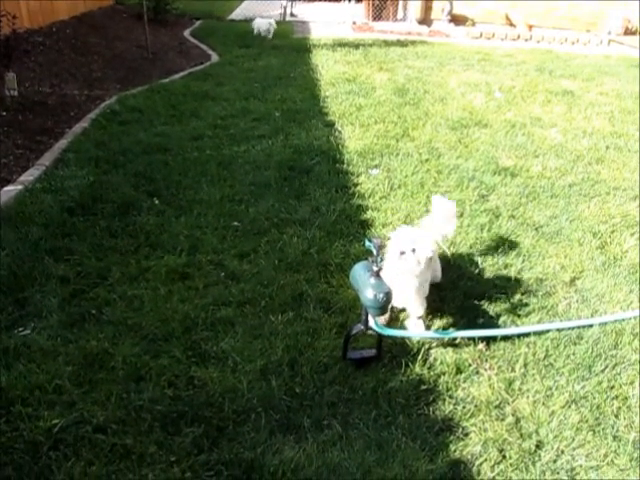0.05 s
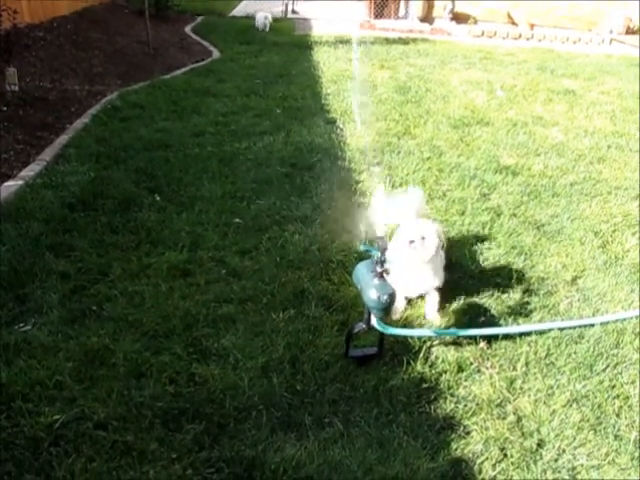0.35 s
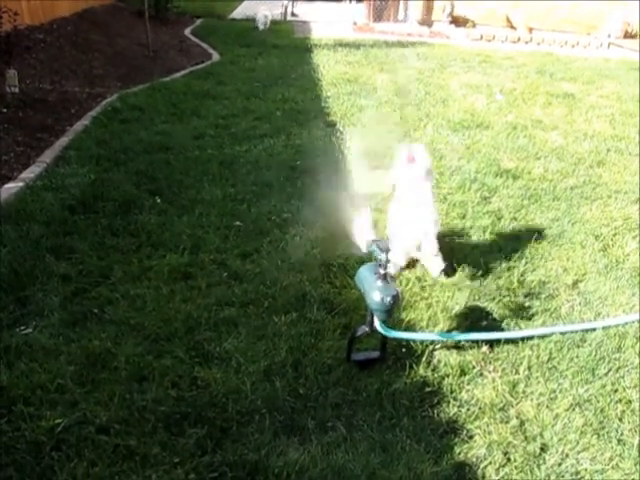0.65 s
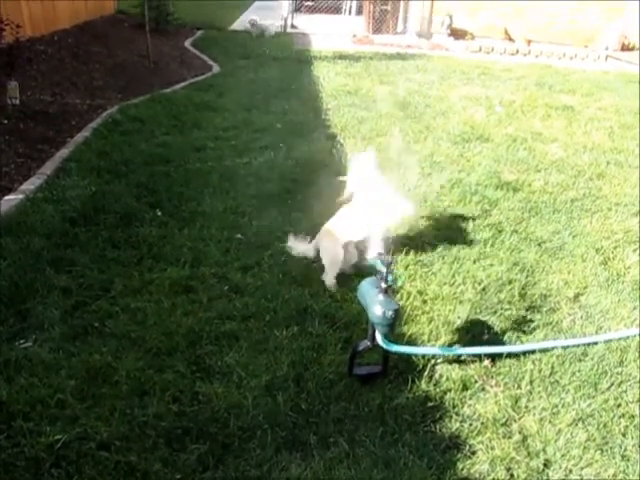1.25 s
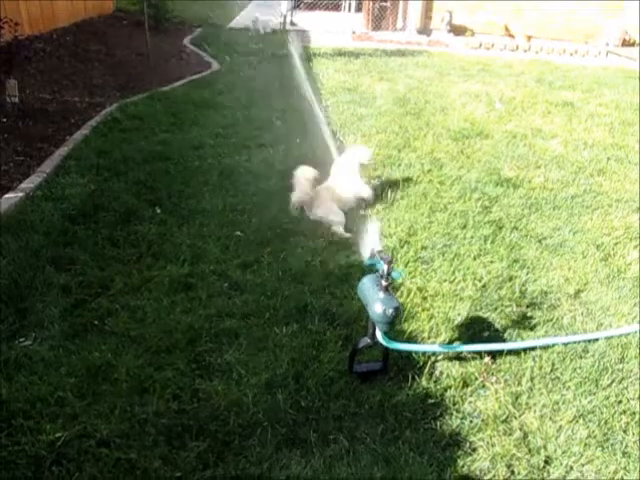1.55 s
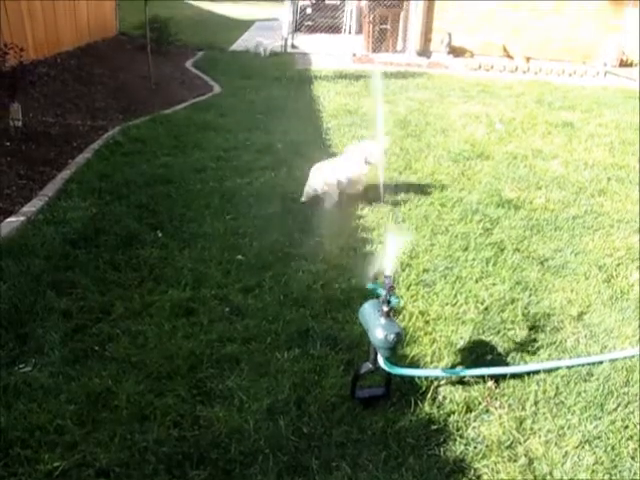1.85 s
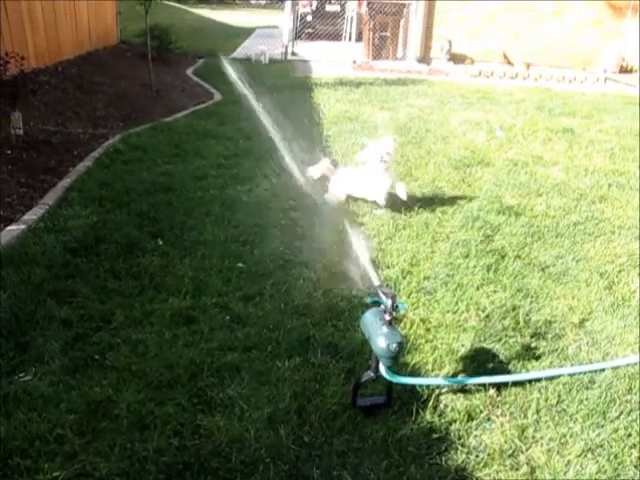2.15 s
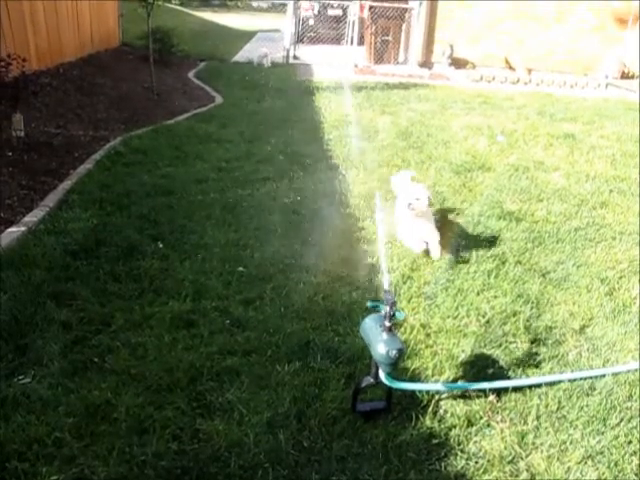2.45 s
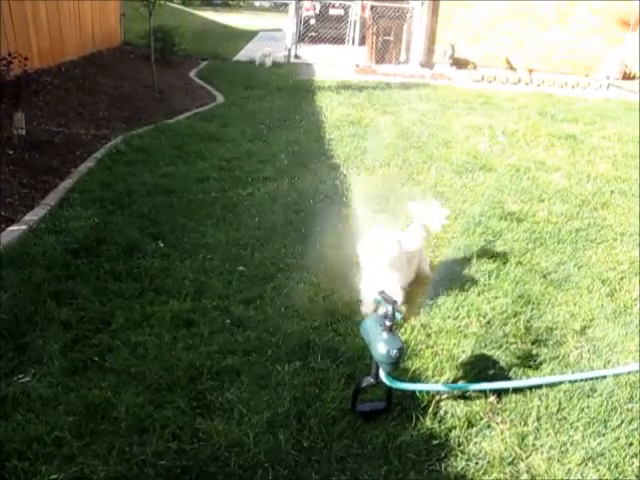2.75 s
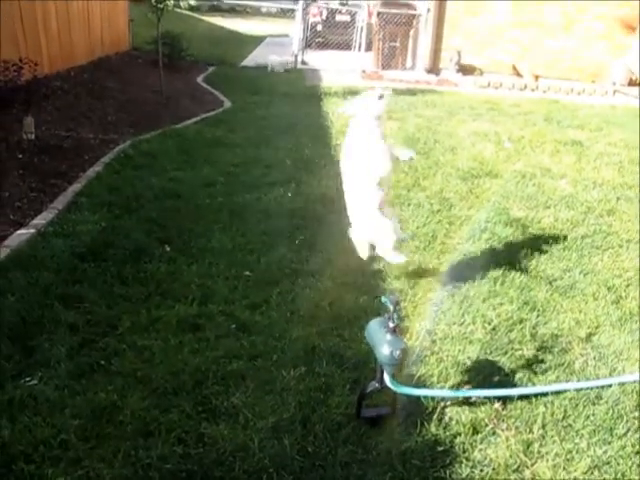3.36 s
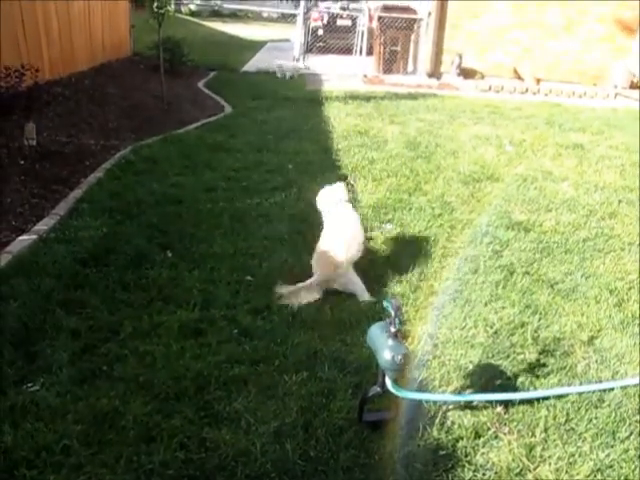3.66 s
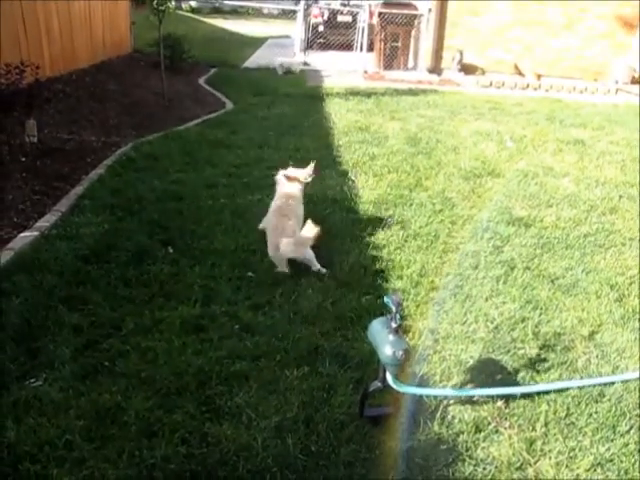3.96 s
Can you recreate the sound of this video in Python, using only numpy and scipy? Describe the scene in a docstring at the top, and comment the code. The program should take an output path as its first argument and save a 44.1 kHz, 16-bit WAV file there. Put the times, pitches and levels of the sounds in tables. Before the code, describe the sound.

An impact sprinkler ticks on a back lawn, following one hoarse, rising yip from a small dog at the very start. From 0.2 seconds, sharp, even ticks run over hissing water, breaking into quick rattles near 0.7, 1.3, 2.1 and 2.8 seconds. The ticking ends with a splash around 3.4 seconds, leaving a few drops and faint outdoor air. Soft wind buffets the microphone near 0.9 and 3.5 seconds.

```python
"""First you hear a small dog's hoarse, rising yip; then an impact sprinkler ticks on a back lawn.
Its arm slaps the hissing water jet in slow runs, then rattles back through its own spray.
Each slap rings the sprinkler head and echoes off the ground and a fence.
Behind it all are a faint murmur of outdoor air, a thin hum and low buffets on the microphone."""
import sys
import numpy as np
from scipy import signal
from scipy.fft import rfft, irfft, next_fast_len
from scipy.io import wavfile
from scipy.ndimage import uniform_filter1d, map_coordinates

SR = 44100
rng = np.random.default_rng(int(sys.argv[2]) if len(sys.argv) > 2 else 0)


def put_to_file(sound):
    """Save the sound as 16-bit audio at rate SR, in the file named by the first command-line argument."""
    columns = np.atleast_2d(sound).T  # one column per channel
    safe = np.clip(columns, -1, 1)
    whole_steps = np.round(safe * 32767)
    wavfile.write(sys.argv[1], SR, whole_steps.astype(np.int16))


N = 176400  # 4 seconds

# Table levels are relative: the functions turn them up or down.
# How loud each sound is as time passes: time_s, level_db
AIR_LEVEL = [(0.3, -80.5), (0.97, -68), (4.0, -68.5)]
BUFFET_LEVEL = [(0, -93), (.58, -79), (.72, -59), (.82, -55.5), (.92, -51.5), (1.02, -67), (3.05, -83.5),
                (3.28, -65), (3.34, -56), (3.41, -66.5), (3.55, -50.5), (3.62, -69), (4, -70)]
JET_LEVEL = [(.2, -84.5), (.3, -70), (.6, -65), (.8, -61.5), (1.4, -58), (1.9, -63), (3.26, -63),
             (3.3, -52.5), (3.35, -63.5), (3.42, -75), (3.88, -75.5), (3.95, -81.5)]
SLOW_SLAP_LEVEL = [(.236, -52.5), (.297, -45.5), (.59, -42), (.8, -36.5), (1.44, -34), (1.85, -37),
                   (2.21, -36.5), (3.3, -37), (3.385, -57.5)]
# The colour of each sound, meaning how strong its lows and highs are: pitch_hz, level_db
AIR_COLOUR = [(25, 2.5), (60, 8.5), (170, 2.5), (280, -6), (430, -8), (620, -0.5), (1000, -7.5),
              (1600, -9.5), (3000, -22.5), (8000, -53)]
BUFFET_COLOUR = [(20, 2.5), (90, 0.5), (250, -21.5), (600, -73.5)]
WALL_COLOUR = [(700, -28.5), (1050, -5), (1350, -7.5), (1720, -5), (2800, -12), (9000, -27)]
JET_COLOUR = [(500, -14.5), (2000, -7), (4800, -1), (7500, -2.5), (10500, -7), (15000, -16.5)]
THROAT_COLOUR = [(150, -18.5), (480, -22), (750, -6.5), (1050, 4), (1350, -1), (2050, 1), (2650, 1),
                 (3500, -13), (4100, -11.5), (5600, -18), (8000, -26), (11000, -41.5)]
SPRAY_COLOUR = [(300, -23), (1500, -12), (3000, -5.5), (4800, 0), (7300, 2.5), (9500, -7), (12000, -8),
                (16000, -18)]
SLAP_COLOUR = [(300, -15), (1100, -18.5), (1600, -30.5), (3200, -8), (5000, 7.5), (7200, -1), (9200, -5.5),
               (10500, -0.5), (14000, -6.5), (16500, -25.5)]
FENCE_COLOUR = [(3000, -11), (4500, -13.5), (6000, -12), (8300, 3), (10000, -4)]
# Swells of the hum and of soft water splats: middle_s, half_length_s, level_db
HUM_SWELLS = [(1.646, 0.046, -68.5), (2.452, 0.062, -67.5), (3.682, 0.03, -59), (3.795, 0.03, -65)]
SPLAT_SWELLS = [(1.213, 0.01, -57.5), (1.527, 0.018, -61.5), (3.506, 0.006, -73)]
# Last drops on the grass, and squeaks of the sprinkler head: start_s, level_db
LAST_DROPS = [(3.515, -69), (3.61, -68)]
SQUEAKS = [(.611, -48), (2.7085, -44)]
# The dog's voice through its yip: time_s, pitch_hz, tone_db, rasp_db
YIP_SHAPE = [(0, 895, -20.5, -22.5), (.01, 798, -28.5, -28.5), (.02, 987, -32, -33),
             (.034, 1078, -35.5, -34.5), (.041, 1502, -32.5, -35), (.06, 1641, -31.5, -40.5),
             (.07, 1892, -31, -41), (.077, 1747, -32.5, -35), (.086, 1992, -37.5, -40),
             (.1, 2020, -61, -47.5)]
# Notes the sprinkler head rings at: pitch_hz, width_hz, level_db
HEAD_NOTES = [(3463, 350, -2.5), (3930, 500, 1), (4744, 200, 7.5), (5180, 160, 8.5), (5880, 51, -17),
              (6700, 58, 3), (7190, 200, 6)]
# Slaps of the slow forward sweep: start_s
SLOW_SLAP_TIMES = [0.2363, 0.2968, 0.3537, 0.4125, 0.4712, 0.5289, 0.5885, 0.649, 0.7988, 0.8566, 0.9162,
                   0.9759, 1.0347, 1.0938, 1.1524, 1.2116, 1.2717, 1.4438, 1.5024, 1.5609, 1.6185, 1.6775,
                   1.736, 1.7951, 1.854, 1.9122, 1.9715, 2.03, 2.2094, 2.2669, 2.3255, 2.3832, 2.4417,
                   2.4999, 2.5598, 2.6182, 2.6777, 2.7376, 2.9156, 2.9731, 3.0319, 3.0906, 3.1491, 3.2077,
                   3.266, 3.324, 3.387]
# Fast runs back: first_slap_s, last_slap_s, last_level_db
RETURN_RUNS = [(0.6676, 0.737, -40.5), (1.291, 1.3832, -35.5), (2.051, 2.149, -38.5), (2.7589, 2.8537, -38)]
# How the nearby sounds lean left or right: pitch_hz, left_minus_right_db
BALANCE = [(1200, 0.6), (2400, -3), (4400, 1.5), (8000, 3), (12000, -0.5)]

RETURN_STEP_S = .0186  # rough time between fast slaps


def amp(db):
    """Turn decibels into a number to multiply by."""
    return 10 ** (np.asarray(db) / 20)


def unit(x):
    """Scale a sound to an average power of 1."""
    return x / np.sqrt(np.mean(x ** 2) + 1e-20)


def along(points, hz):
    """Read a (pitch_hz, level_db) table between its rows, on a log pitch scale."""
    pitch_hz, level_db = np.transpose(points)
    return np.interp(np.log(hz + 1), np.log(pitch_hz + 1), level_db)


def curves(rows):
    """One value per sample for each column after the time."""
    time_s, *columns = np.transpose(rows)
    return [np.interp(np.arange(N) / SR, time_s, column) for column in columns]


def wobble(rate):
    """A smooth curve through `rate` random values a second."""
    return map_coordinates(rng.standard_normal(int(N * rate / SR) + 4), [np.arange(N) * rate / SR])


def swell(middle_s, half_s):
    """A bell-shaped rise and fall."""
    return np.exp(-.5 * ((np.arange(N) / SR - middle_s) / half_s) ** 2)


def impulses(rows):
    """One click for each (start_s, level_db) row."""
    start_s, level_db = np.transpose(rows)
    return np.bincount(np.round(start_s * SR).astype(int), amp(level_db), N)[:N]


def fading(hits, fade_s):
    """A level that jumps at each click, then falls 60 dB in fade_s."""
    return signal.lfilter([1], [1, -amp(-60 / (fade_s * SR))], hits)


def filtered(x, response):
    """Multiply each frequency in x by response(hz)."""
    size = next_fast_len(N + SR // 2)
    return irfft(rfft(x, size) * response(np.fft.rfftfreq(size, 1 / SR)), size)[..., :N]


def delay(hz, late_s):
    """The filter response that makes a sound arrive later."""
    return np.exp(-2j * np.pi * hz * late_s)


def noise(colour, width):
    """Coloured stereo noise; width 0 makes both sides the same."""
    mid, side = filtered(rng.standard_normal((2, N)), lambda hz: amp(along(colour, hz)))
    return unit(np.array([mid + width * side, mid - width * side]))


def band(pitch_hz, spread):
    """Noise around one pitch; spread is a fraction of that pitch."""
    return unit(filtered(rng.standard_normal(N), lambda hz: 1 / (1 + ((hz / pitch_hz - 1) / spread) ** 2)))


def struck(hits, colour):
    """Colour each click, keeping its energy and adding nothing before it (minimum phase)."""
    size = 1024
    gain = amp(along(colour, np.fft.rfftfreq(size, 1 / SR)))
    cepstrum = irfft(np.log(gain))
    cepstrum[1:size // 2] *= 2
    cepstrum[size // 2 + 1:] = 0
    pulse = irfft(np.exp(rfft(cepstrum)))
    return signal.fftconvolve(hits, pulse / np.linalg.norm(pulse))[:N]


def outdoor_air():
    """Air murmurs and now and then buffets the microphone with a low rumble."""
    (air_db,), (buffet_db,) = curves(AIR_LEVEL), curves(BUFFET_LEVEL)
    murmur = amp(air_db + 4) * noise(AIR_COLOUR, width=0.25)
    return murmur + amp(buffet_db) * noise(BUFFET_COLOUR, width=0.57)


def hum(pitch_hz=578):
    """A thin, wavering hum comes and goes."""
    level = sum(amp(db) * swell(s, half) for s, half, db in HUM_SWELLS) * amp(3 * wobble(40))
    return level * np.sin(2 * np.pi * np.cumsum(pitch_hz + 12 * wobble(70)) / SR)


def peep(pitch_hz=2770):
    """One faint, far peep at the very end."""
    tone = np.sin(2 * np.pi * pitch_hz * np.arange(N) / SR)
    return amp(-72.5) * swell(middle_s=3.981, half_s=0.005) * tone


def wall_echoes(x, fade_s=0.57):
    """The walls around the lawn add a faint, fading tail."""
    t = np.arange(SR) / SR
    tail = rng.standard_normal((2, SR)) * amp(-60 * t / fade_s)
    tail = (tail + tail.mean(axis=0)) / np.linalg.norm(tail[0]) / np.sqrt(5 / 2)
    echoes = signal.fftconvolve(x, tail, axes=1)[:, :N]
    return filtered(echoes, lambda hz: amp(along(WALL_COLOUR, hz) - 11.5))


def splats():
    """Water lands on something soft."""
    level = sum(amp(db) * swell(s, half) for s, half, db in SPLAT_SWELLS)
    return level * band(pitch_hz=2040, spread=0.27)


def jet():
    """The jet hisses, grainy with falling drops; a few land after its closing splash."""
    level_db, = curves(JET_LEVEL)
    stream = amp(level_db + 0.79 * wobble(29.99) + 3.0 * wobble(900))
    drops = fading(impulses(LAST_DROPS), fade_s=0.047)
    return (stream + drops) * noise(JET_COLOUR, width=0.7)


def squeaks(pitch_hz=5300):
    """The head squeaks shortly before two of the runs back."""
    phase = 2 * np.pi * np.cumsum(pitch_hz + 300 * wobble(1500)) / SR
    return uniform_filter1d(fading(impulses(SQUEAKS), fade_s=0.041), size=60) * np.sin(phase)


def dog_yip(growl_hz=96.9, end_s=0.12):
    """A cracked, rising squeal inside a throaty rasp; a growl makes both flutter."""
    pitch_hz, tone_db, rasp_db = curves(YIP_SHAPE)
    t = np.arange(N) / SR
    flutter = np.cos(2 * np.pi * np.cumsum(growl_hz * (1 + 0.067 * wobble(84.5))) / SR)
    phase = 2 * np.pi * np.cumsum(pitch_hz * (1 + .075 * wobble(900))) / SR
    shake = unit(amp(2.5 * wobble(500)) * (1 + .25 * flutter))
    squeal = np.sqrt(2) * amp(tone_db - 1) * shake * (np.sin(phase) + amp(-17) * np.cos(2 * phase))
    low_level = 2 * amp(rasp_db - 2.5) * np.clip(t / end_s, 0, 1)  # a lower voice fades in
    low_voice = low_level * np.sin(0.61 * phase + 1.1 * wobble(303.8))
    rasp = amp(rasp_db + 0.5) * unit(1 + .4 * flutter) * noise(THROAT_COLOUR, width=0.1)
    fade_in, fade_out = np.clip(t / .004, 0, 1), np.clip((end_s - t) / 0.036, 0, 1)
    return (squeal + low_voice + rasp) * fade_in * fade_out


def fence_echo(slap, late_s=.0123):
    """The fence sends each slap back, louder on the left."""
    echo = filtered(slap, lambda hz: amp(along(FENCE_COLOUR, hz) - 3) * delay(hz, late_s))
    return echo * amp([[3.5], [-3.5]])


def head_ring(x):
    """The sprinkler head rings at its own notes when hit."""
    def response(hz):
        notes = sum(amp(db) * 1j * hz * width / (pitch * pitch - hz * hz + 1j * hz * width)
                    for pitch, width, db in HEAD_NOTES)
        return notes / np.sqrt(np.mean(abs(notes) ** 2))
    return filtered(x, response)


def return_hiss():
    """The steady spray level while the arm stays in the jet on each run back."""
    t = np.arange(N) / SR
    held = sum(amp(db - 16.5) * ((t > first - RETURN_STEP_S) & (t < last))
               for first, last, db in RETURN_RUNS)
    return uniform_filter1d(held, size=200)


def spray(slow_hits, fast_hits):
    """Each slap throws a puff of drops that rings the head; runs back add a low slosh."""
    puffs = fading(slow_hits, fade_s=0.048)
    drops = amp(2.25 * wobble(1200))
    return_spray = amp(-5) * fading(fast_hits, fade_s=0.054) + return_hiss()
    splash = drops * (amp(-3) * puffs + return_spray) * noise(SPRAY_COLOUR, width=0.33)
    slosh = amp(-18.5) * drops * return_spray * band(pitch_hz=1064, spread=0.71)
    ring = amp(-9) * head_ring((puffs + return_spray) * rng.standard_normal(N))
    return splash + slosh + ring


def slow_slaps():
    """Slow forward slaps, each a little different in strength: start_s, level_db."""
    level_db = np.interp(SLOW_SLAP_TIMES, *np.transpose(SLOW_SLAP_LEVEL))
    return list(zip(SLOW_SLAP_TIMES, level_db + .5 * rng.standard_normal(len(level_db))))


def fast_slaps(grow_db=6):
    """Evenly spaced slaps that grow louder through each run back: start_s, level_db."""
    return [(first + progress * (last - first), db - grow_db * (1 - progress))
            for first, last, db in RETURN_RUNS
            for progress in np.linspace(0, 1, round((last - first) / RETURN_STEP_S) + 1)]


def arm_slaps(slow, fast, bounce_s=0.00065, ground_s=.00208, bright_hz=13000):
    """The arm hits hard, bounces and rings the head; slow slaps get an extra bright edge."""
    hits = impulses(slow + fast)
    bounces = impulses([(s + bounce_s * np.exp(rng.normal(0, .025)), db - 7) for s, db in slow + fast])
    snap = amp(15.5) * struck(hits + bounces, SLAP_COLOUR) + amp(13) * head_ring(hits)
    for _ in range(2):  # the ground sends the snap back almost at once
        snap = filtered(snap, lambda hz: 1 + amp(-10.5) * delay(hz, ground_s))
    crack = amp(-13.5) * fading(hits, fade_s=0.021) * noise(SLAP_COLOUR, width=0.16)
    edge = amp(1) * filtered(impulses(slow), lambda hz: 1 - 1 / (1 + (hz / bright_hz) ** 20))
    return snap + crack + edge


def sprinkler():
    """The arm slaps the jet, throwing spray and raising an echo from the fence."""
    slow, fast = slow_slaps(), fast_slaps()
    slaps = arm_slaps(slow, fast)
    return slaps + spray(impulses(slow), impulses(fast)) + fence_echo(slaps)


def scene(lag_s=.000036):
    """Sprinkler and dog are ahead of us; their sound reaches the right side just before the left."""
    near = sprinkler() + squeaks() + jet() + splats() + dog_yip()
    sides = np.array([[1], [-1]]) / 2
    near = filtered(near, lambda hz: amp(sides * along(BALANCE, hz)) * delay(hz, lag_s * sides))
    return near + wall_echoes(near) + hum() + peep() + outdoor_air()


def record(dry, top_hz=16400):
    """Cut away the very highest treble."""
    return filtered(dry, lambda hz: 1 / np.sqrt(1 + (hz / top_hz) ** 300))


dry = scene()
out = record(dry)
put_to_file(out)
```